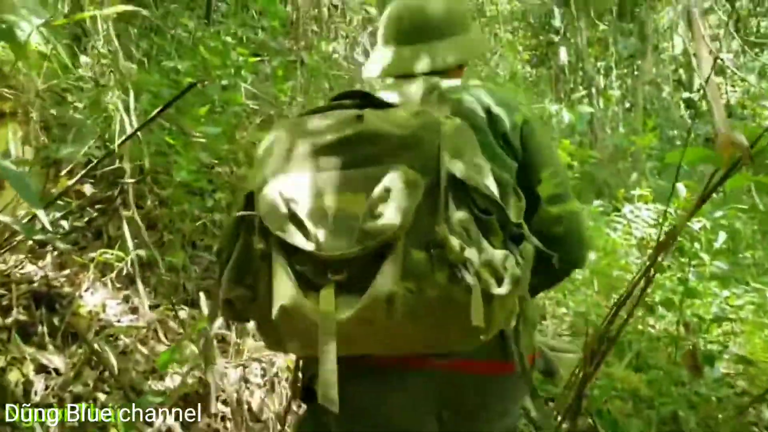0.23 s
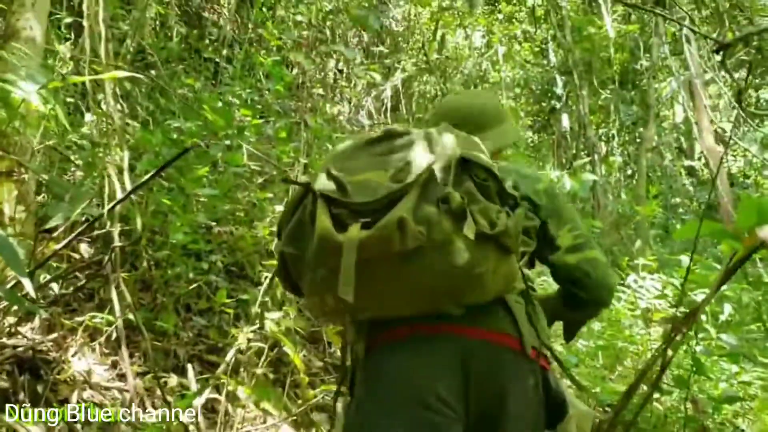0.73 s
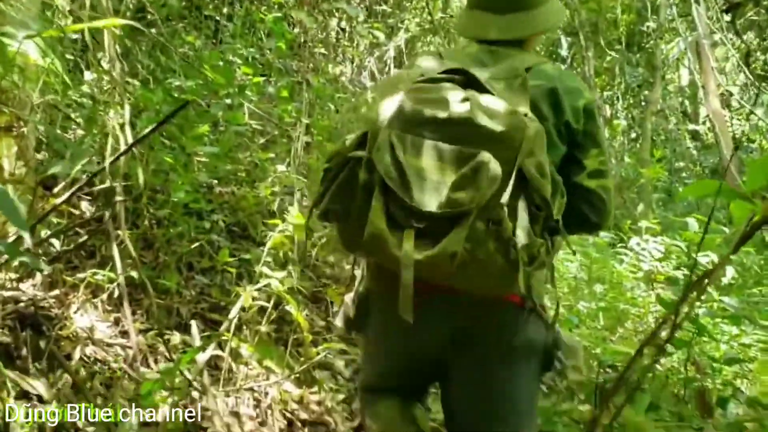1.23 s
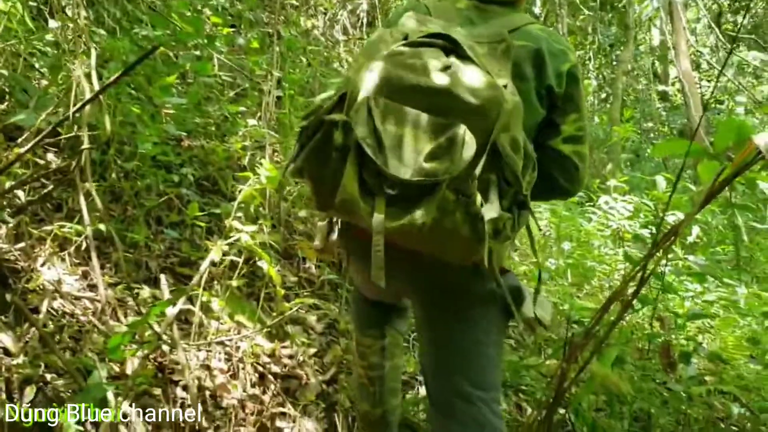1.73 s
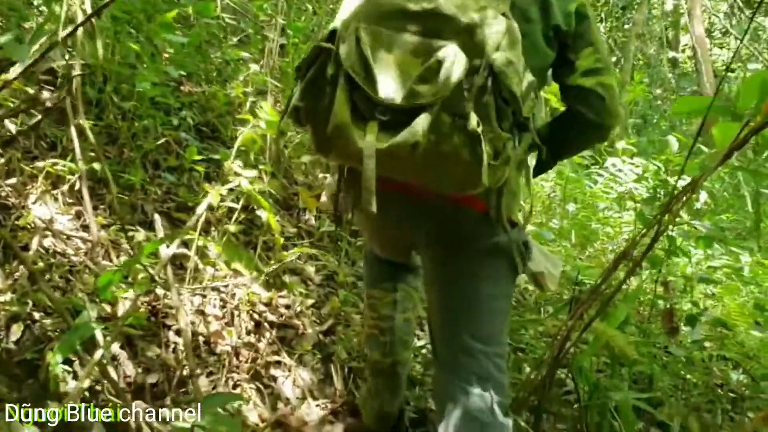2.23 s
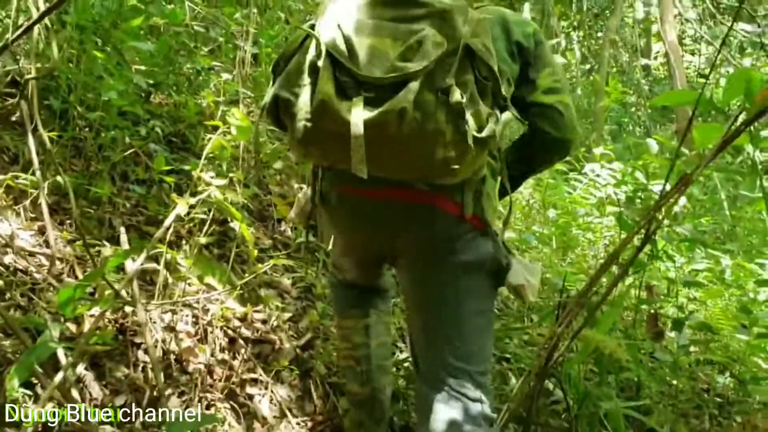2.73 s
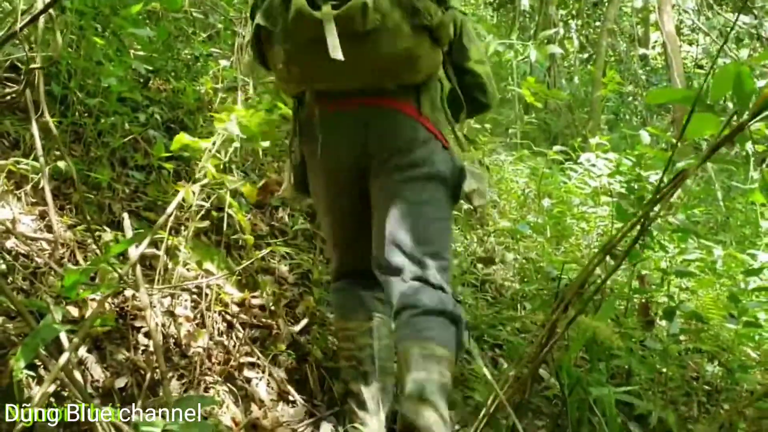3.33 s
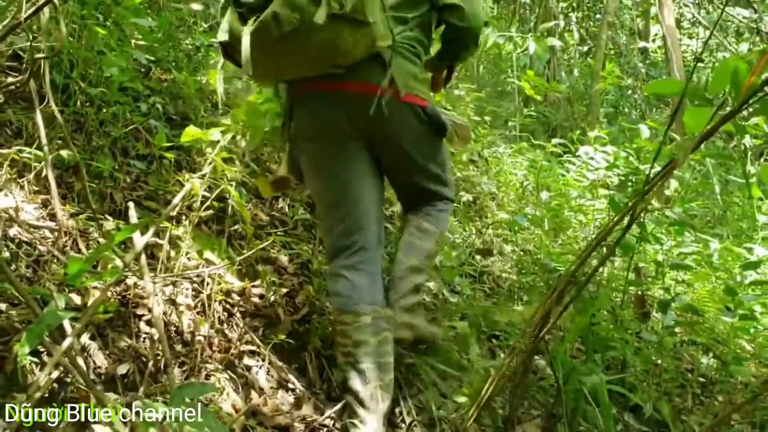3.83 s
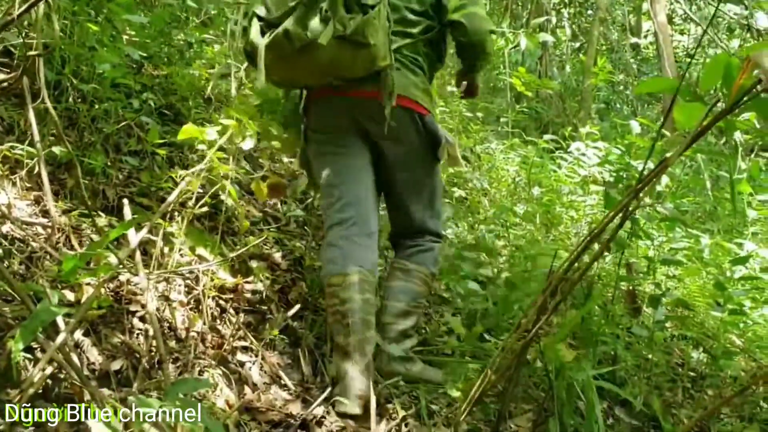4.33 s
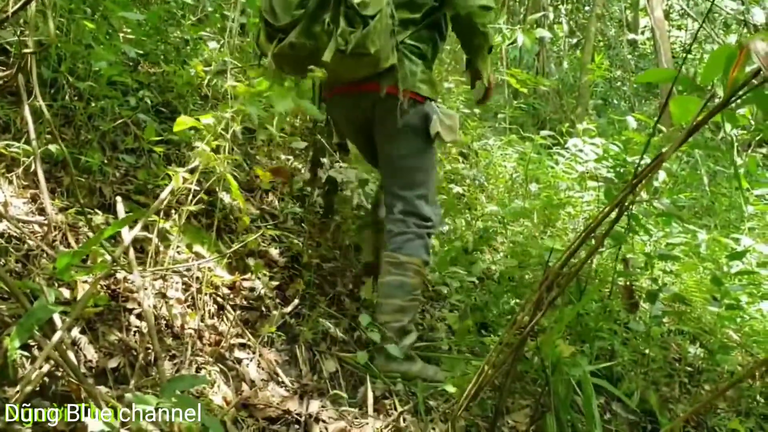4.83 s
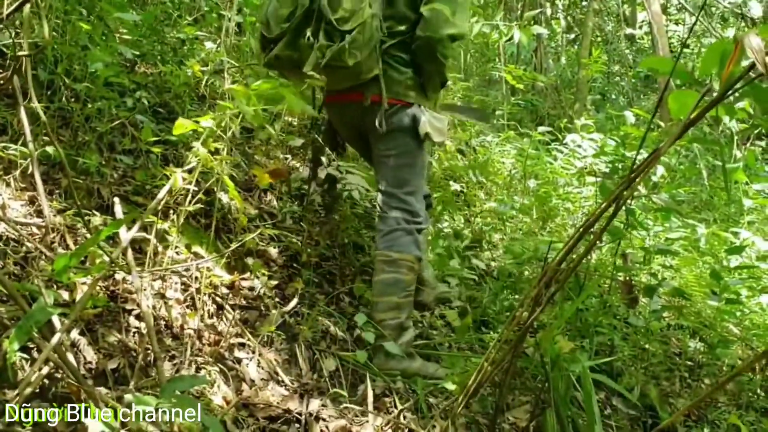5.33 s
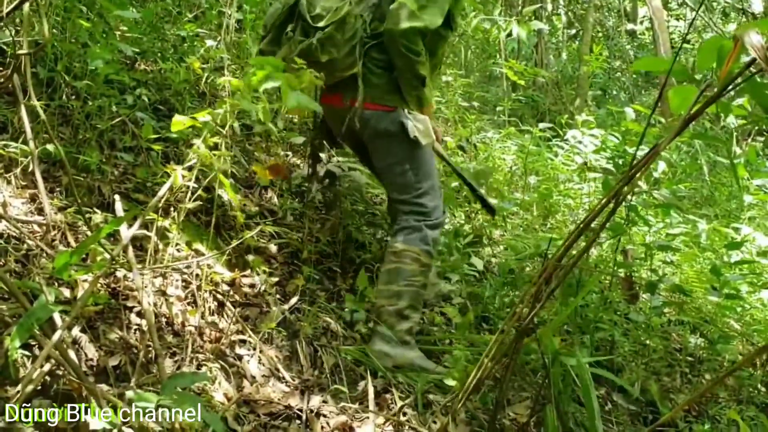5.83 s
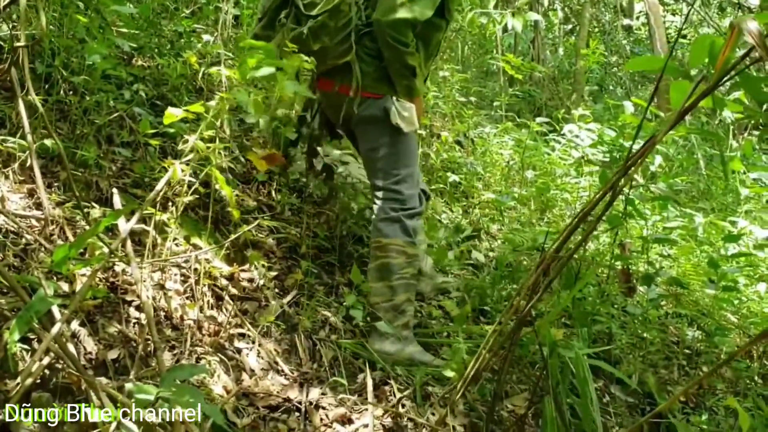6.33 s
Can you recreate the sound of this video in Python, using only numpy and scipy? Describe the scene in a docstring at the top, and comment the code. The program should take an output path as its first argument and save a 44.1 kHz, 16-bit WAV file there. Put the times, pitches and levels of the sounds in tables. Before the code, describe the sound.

Close, dry footsteps of rubber boots in leaf litter: crackling leaves, scraping stems and faint sole creaks. The loudest crush comes within the first second, a firm hollow knock near two and a half seconds, then quieter rustling and another strong crunch around four. Sharp twig snaps scatter throughout. A brief low wind buffet touches the left side. Outdoors in forest, stereo microphone nearby, very faint airy hush.

```python
"""A faint forest hush runs throughout: shaped noise. From the start, rubber boots tread through dry leaf litter:
noise rises and falls with each stroke as leaves crackle, stems scrape, soles crease and soil is pressed.
Random tiny ticks join in; from 0.3 s twig pops and hollow knocks sound as fading rings, from 0.4 s twigs and
brittle leaves snap as noise bursts, and from 0.8 s shorter rings knock too. Around 1.7 to 2.1 s a puff of
wind, made of slow pressure swings and rumble, buffets the left microphone port."""
import sys
import numpy as np
from scipy import signal
from scipy.fft import rfft, irfft, next_fast_len
from scipy.io import wavfile
from scipy.ndimage import uniform_filter1d, map_coordinates

SR = 44100
rng = np.random.default_rng(int(sys.argv[2]) if len(sys.argv) > 2 else 0)


def boost_factor(decibels):
    """Convert a level in decibels to a linear amplitude factor."""
    exponent = np.asarray(decibels, float) / 20
    return 10 ** exponent


def dump(signal):
    """Clip the signal to [-1, 1] and save it as 16-bit WAV at the path in sys.argv[1]."""
    limited = np.clip(np.atleast_2d(signal).T, -1, 1)
    pcm = np.round(limited * 32767).astype(np.int16)
    wavfile.write(sys.argv[1], SR, pcm)


N = 289737  # length in samples
TOP_HZ = 15700  # upper band limit


def unit(x):
    """Scaled to rms 1."""
    return x / np.sqrt(np.mean(x ** 2) + 1e-20)


def along(points, hz):
    """Reads a value off (Hz, value) points joined on a log frequency axis."""
    f, value = np.transpose(points)
    return np.interp(np.log(hz + 1), np.log(f + 1), value)


def wobble(rate):
    """A smooth random curve with rate knots a second."""
    return map_coordinates(rng.standard_normal(N // 50), [np.arange(N) * rate / SR])


def filtered(x, response):
    """Multiplies the spectrum of x by a response of frequency."""
    m = next_fast_len(N + SR // 4)
    hz = np.fft.rfftfreq(m, 1 / SR)
    return irfft(rfft(x, m) * response(hz), m)[..., :N]


# How alike the sound is at the two ports: f/Hz, left-right likeness (1 = the same)
ALIKE = [(60, 0.75), (200, 0.87), (400, 0.74), (800, 0.43), (1500, 0.28), (3000, 0.077), (5000, 0.011)]


def at_ports(pair, spectrum):
    """Foliage scatters sound differently to each port: alike in the bass, unrelated in the treble."""
    def mid_side(hz):
        turn = np.arccos(np.clip(along(ALIKE, hz), -1, 1)) / 2
        return boost_factor(along(spectrum, hz)) * [np.cos(turn), np.sin(turn)]

    mid, side = filtered(pair, mid_side)
    return unit(np.array([mid + side, mid - side]))


def swells(times, levels_db, rises, falls):
    """Power of overlapping strokes, each rising to its peak and falling away steadily in dB."""
    crest_s, shortest_s, step_s = 0.0026, 0.012, 0.001  # peak rounding, least rise or fall, time step
    t = np.arange(0, N / SR + 2 * step_s, step_s)[:, None] - times
    away = np.hypot(t, crest_s) - crest_s
    slope_s = np.maximum(np.where(t < 0, rises, falls), shortest_s)
    power = boost_factor(2 * (levels_db - 20 * away / slope_s)).sum(1)
    return np.interp(np.arange(N) / SR, np.arange(len(power)) * step_s, power)


def breaks(per_s, spread_db, life_ms, clump_db):
    """Loudness of many small fractures: random moments, a few much larger, sudden start, quick fade."""
    chance, size = rng.random(N), rng.exponential(size=N)
    strength_db = spread_db * np.minimum(size, 4) + clump_db * wobble(25)
    kicks = (chance < per_s / SR) * boost_factor(strength_db) ** 2
    keep = np.exp(-1000 / (life_ms * SR))  # share of power left after one sample
    return unit(np.sqrt(signal.lfilter([1], [1, -keep], kicks)))


def crackle(spectrum, fractures, hiss, patchy_db):
    """Fractures heard over a share of smooth rubbing; the favoured pitches change from moment to moment."""
    z = signal.stft(rng.standard_normal((2, N)), nperseg=1024)[2]
    field = rng.standard_normal(z.shape[1:])
    field = uniform_filter1d(field, size=4, axis=0)  # smooth over pitch
    field = uniform_filter1d(field, size=3, axis=1)  # smooth over time
    noise = signal.istft(z * boost_factor(patchy_db * unit(field)), nperseg=1024)[1][:, :N]
    return at_ports(np.sqrt(hiss ** 2 + fractures ** 2) * noise, spectrum)


# Tone of the far hush: f/Hz, relative level/dB per Hz
FOREST = [(24, -50), (40, 15.5), (236, 3), (400, -4), (766, -20), (4410, 13.5), (7280, 6), (8670, -10),
          (15800, -8)]


def forest():
    """Faint hush of far leaves and air: shaped noise whose level wavers slightly."""
    hush = at_ports(rng.standard_normal((2, N)), FOREST)
    return boost_factor(-68.5 + 0.85 * wobble(3.1)) * hush


# Each crush or brush of litter: t/s at peak, leaf level/dB, rise over 20 dB/s, fall over 20 dB/s,
# stems over leaves level/dB; a rise or fall below the shortest allowed, even negative, means abrupt
RUSTLES = [(0.054, -46, -0.3, 0.222, -4.5), (0.113, -46.5, -0.04, 0.03, -8), (0.227, -53.5, 0.4, 0.3, -4.5),
           (0.292, -50.7, 0.059, 0.43, -2.5), (0.4, -42.0, 0.1, 0.02, -6), (0.434, -46, 0.1, 0.083, -5),
           (0.602, -39.5, 0.14, 0.549, -4), (0.707, -36.0, 0, 0.098, -7), (0.784, -35, 0.18, 0.2164, -7.5),
           (0.937, -47, 0.2, 0.12, -7.5), (0.993, -48.3, 0.243, 0.03, -5.1), (1.054, -44, 0.103, 0.06, -2),
           (1.12, -42.5, 0.12, 0.039, -7), (1.304, -50.1, 1.2, 0.178, -7), (1.39, -57.5, -0.2, 0.2, 0.5),
           (1.476, -51, -0.02, 0.18, -3), (1.516, -53, -0.03, 0.08, -1.5), (1.645, -53, 0.014, 0.132, -7.5),
           (1.835, -51.5, 0.118, 1.17, -7), (1.909, -43, 0.05, 0.199, -11.5), (1.976, -48.5, 0, 0.14, -4.5),
           (2.077, -45.5, 0.07, 0.057, -6.4), (2.231, -52.5, -0.26, 0.08, -11.5),
           (2.311, -54, 0.12, 0.27, -6.5), (2.389, -54, -0.17, 0.5, -10.5), (2.482, -39, 0.051, 0.099, -4),
           (2.531, -46.2, 0.04, 0.04, -3.5), (2.793, -48.6, 0.022, 0.122, -11.7),
           (2.916, -49, 0.12, 0.18, -7), (3.01, -51.5, 0.32, 0.17, -6.5), (3.141, -50, 0.14, 0.74, -6),
           (3.29, -50.5, 0.1, -0.5, -11.5), (3.382, -46.5, 0.06, 0.262, -5.5),
           (3.438, -48, 0.2, 0.03, -4.5), (3.598, -51, 0.67, 0.13, -5), (3.651, -49, 0.08, 0.22, -6),
           (3.885, -45, 0.13, 0.54, -10.5), (4.023, -40, 0.172, 0.5665, -8),
           (4.099, -37.5, 0.073, 0.11, -4.5), (4.2, -41.5, 0.29, 0.105, -3.5),
           (4.311, -49.5, 0.1, 0.62, -2), (4.5, -53, 1, 0.11, -2.5), (4.791, -58, 0.2, 0.3, -10),
           (4.995, -60, 0.1, 0.7, -8.5), (5.178, -44.5, 0.07, 0.11, -5.3), (5.287, -54, 0.1, 0.061, -4.5),
           (5.513, -57.5, 0.17, 0.18, -1.2), (5.721, -48, 0.112, 0.22, -7.9),
           (5.818, -46.5, 0.142, 0.112, -6), (5.909, -49.5, 0.14, 0.09, -8.5), (6.162, -52, 0, 0.16, -5),
           (6.198, -48.4, 0.03, 0.18, -3.5), (6.321, -46.1, 0.11, 0.26, -7.5),
           (6.418, -46.4, 0.44, 0.1, -8)]


def rustle_powers():
    """Each stroke through the litter sets the power of leaves and stems together."""
    s, leaf_db, rise, fall, stem_db = np.transpose(RUSTLES)
    return swells(s, leaf_db, rise, fall), swells(s, leaf_db + stem_db, rise, fall)


# Tone of crushed leaves: f/Hz, relative level/dB per Hz
LEAF = [(2500, -21.5), (4500, -2.5), (7000, 1), (8700, -5.5), (11000, -0.5), (14700, 1.5), (17000, -5)]
# Tone of scraped stems: f/Hz, relative level/dB per Hz
STEM = [(500, -54), (900, -10.5), (1250, -4), (1700, -4), (2600, -2.5), (4000, -0.5), (8000, -15.5)]


def litter():
    """Leaves crush crisply; stems scrape lower with the same tiny breaks."""
    crush, scrape = rustle_powers()
    brittle = breaks(per_s=1100, spread_db=3.0, life_ms=2.0, clump_db=1.5)
    leaves = crackle(LEAF, brittle, hiss=1.24, patchy_db=2.0)
    stems = crackle(STEM, brittle, hiss=1.3, patchy_db=2.5)
    return np.sqrt(crush) * leaves + np.sqrt(scrape) * stems


# Weight going onto a boot: t/s at peak, rubber creasing level/dB, weight on soil level/dB,
# rise over 20 dB/s, fall over 20 dB/s; a rise or fall below the shortest allowed means abrupt
FOOTFALLS = [(0.124, -57, -71, 0.3, 0.24), (0.347, -61, -87, 0.2, 0.6), (0.601, -56, -71, 0.26, 0),
             (0.757, -50.5, -66.5, 0.32, 0.29), (0.91, -58.5, -74.5, 0.2, 0.94),
             (1.425, -66, -73.5, 0.4, 0.2), (1.66, -62.5, -75, 0.13, 1.5), (2.084, -61, -65.5, 0.1, 0.8),
             (2.496, -52, -53.5, 0.06, 0.1059), (3.09, -68, -73, 0.5, 2.5), (3.403, -63.5, -61, 0.08, 0.06),
             (4.096, -54.5, -58.5, 0.14, 0.5), (4.191, -65, -50, 0.2, 0.06), (5.22, -70, -75.5, 0.7, 0.37),
             (5.529, -70.5, -72, 0.3, 0.44), (6.212, -65, -67.5, 0.33, 0.53)]
# Tone of the creasing sole: f/Hz, relative level/dB per Hz
SOLE = [(120, -19), (230, -5.5), (400, 1), (550, -3.5), (780, -10.5), (1200, -21.5)]
# Tone of the pressed soil: f/Hz, relative level/dB per Hz
SOIL = [(25, -40), (55, 1), (110, 1.5), (200, 0), (350, -21)]


def boots():
    """Rubber creases and weight thuds into soil, at footfalls and a little as boots move through litter."""
    drag_sole_db, drag_soil_db = -24, -33.5  # under the leaves
    crush, _ = rustle_powers()
    s, sole_db, soil_db, rise, fall = np.transpose(FOOTFALLS)
    crease = swells(s, sole_db, rise, fall) + boost_factor(2 * drag_sole_db) * crush
    thud = swells(s, soil_db, rise, fall) + boost_factor(2 * drag_soil_db) * crush
    creases = breaks(per_s=120, spread_db=3.5, life_ms=2.0, clump_db=-3.0)
    sole = crackle(SOLE, creases, hiss=1.6, patchy_db=1.5)
    soil = crackle(SOIL, creases, hiss=1.44, patchy_db=2.5)
    return np.sqrt(crease) * sole + np.sqrt(thud) * soil


def bursts(rows, lean_db):
    """Each break is a noise burst of a few milliseconds with its own pitch; lean_db is left over right."""
    out, t_ms = np.zeros((2, N + SR)), np.arange(2048) * 1000 / SR
    f = np.fft.rfftfreq(len(t_ms), 1 / SR)
    echo = boost_factor(-18 - 1.3 * t_ms)  # nearby foliage echoes the break
    shape = (1 - np.exp(-t_ms / 0.25)) * (np.exp(-t_ms / 1.1) + echo)
    band = (f < TOP_HZ) * f ** 2 / (f ** 2 + 1800 ** 2)  # little bass
    sides = boost_factor(lean_db / 2 * np.array([[1], [-1]]))
    for s, db, hz in rows:
        colour = 0.65 + np.exp(-(np.log((f + 1) / hz) / 0.34) ** 2)
        noise = rfft(rng.standard_normal((2, len(t_ms))))
        burst = shape * irfft(noise * colour * band) * sides
        burst = burst * 3.5 / np.linalg.norm(burst.mean(0))  # crest about 1
        out[:, round(s * SR):][:, :len(t_ms)] += boost_factor(db) * burst
    return out[:, :N]


def ticks():
    """Small breaks at random moments, their strength following the rustle around them."""
    per_s, least_db, spread_db = 45, 4, 8.5  # rate; least peak over the rustle; extra at most
    draw = rng.random((int(per_s * N / SR), 3))
    s = draw[:, 0] * (N - 1) / SR
    crush, _ = rustle_powers()
    rustle_db = 10 * np.log10(crush[(s * SR).astype(int)])
    level_db = rustle_db + least_db + spread_db * draw[:, 1] ** 2
    hz = 2500 * 6 ** draw[:, 2]
    return bursts(np.transpose([s, level_db, hz]), lean_db=0)


def rings(rows, cycles):
    """One push that fades within a few cycles, alike at both ports, with little deep bass."""
    out, t = np.zeros(N + SR), np.arange(4096) / SR
    for s, db, hz in rows:
        ring = np.sin(2 * np.pi * hz * t) * np.exp(-t * hz / cycles)
        out[round(s * SR):][:len(t)] += boost_factor(db) * ring
    return filtered(out[:N], lambda hz: 1j * hz / (130 + 1j * hz))


# Twig pops and longer-ringing knocks: t/s, level/dB before the ring fades, ring f/Hz
POPS = [(0.2759, -38.5, 1480), (0.684, -40, 600), (0.7985, -34, 566), (0.915, -42, 560), (1.416, -46, 1700),
        (1.5126, -38, 2720), (2.8965, -45, 2220), (4.4855, -41.5, 1300), (5.7179, -42, 1620)]


def pops():
    """A twig pop or hollow knock rings for about two cycles."""
    return rings(POPS, cycles=2.15)


# Single breaks of twigs or brittle leaves: t/s, about the peak level/dB, centre f/Hz
SNAPS = [(0.3922, -29, 15000), (0.4363, -32, 14400), (0.5276, -25.5, 10000), (0.9009, -30, 13000),
         (1.0502, -33, 12000), (1.1234, -36, 13000), (1.4695, -44, 7000), (1.4736, -41, 11000),
         (1.534, -43, 5500), (1.6402, -47, 9000), (1.9041, -32, 14300), (1.9172, -32, 14300),
         (2.079, -34, 13000), (2.151, -32.5, 13500), (2.1545, -38, 5500), (2.2249, -39, 6500),
         (2.7807, -44, 9000), (2.792, -38, 14700), (2.805, -40, 5500), (2.896, -34, 14100),
         (3.1654, -31, 5000), (3.2439, -34.5, 12800), (3.3816, -33, 13100), (3.4917, -37, 5100),
         (3.9791, -28.5, 12000), (4.0135, -31, 9500), (4.1775, -32, 9300), (4.7858, -41, 10000),
         (5.0547, -41, 4400), (5.0945, -44, 5000), (5.1675, -39, 5000), (5.6929, -40, 7000),
         (5.699, -42, 11000), (5.7171, -31, 12000), (5.7184, -33, 7400), (6.0469, -47, 7200)]


def snaps():
    """Twigs and brittle leaves break to the left in bursts, brightest near their own pitch."""
    return bursts(SNAPS, lean_db=4)


# Knocks of the soles on the ground: t/s, level/dB before the ring fades, ring f/Hz
KNOCKS = [(0.7645, -31.5, 610), (2.0789, -41.5, 553), (2.4736, -33, 620), (2.4991, -25, 466),
          (2.504, -33, 180), (4.177, -36, 139), (6.158, -47.5, 318), (6.198, -43.5, 128)]


def knocks():
    """A sole knocks on soft ground, and the ring fades within a cycle or two."""
    return rings(KNOCKS, cycles=0.81)


# Eddies in the wind: t/s at centre, peak level/dB, f/Hz
BUFFET = [(1.691, -43.5, 56), (1.732, -49, 62), (1.779, -46, 56), (1.826, -50, 54), (1.868, -57, 70),
          (2.096, -50.5, 66.3)]


def wind():
    """Eddies roll over the left port, each a slow swing of pressure, joined by a lower-level rumble."""
    t = np.arange(N) / SR
    eddies = np.zeros(N)
    for s, db, hz in BUFFET:
        swing = np.cos(2 * np.pi * hz * (t - s) + rng.uniform(-1.0, 1))
        eddies += boost_factor(db) * np.exp(-((t - s) / 0.013) ** 2) * swing
    rumble = unit(filtered(rng.standard_normal(N), lambda hz: np.exp(-((hz - 65) / 40) ** 2)))
    puff = np.exp(-((t - 1.77) / 0.12) ** 4) * rumble
    return (eddies + boost_factor(-61) * puff) * boost_factor([[0], [-17]])  # left, right


# Difference in sensitivity of the ports: f/Hz, left over right level/dB
LEAN = [(60, 1.5), (180, 3.5), (550, 6), (1650, 0), (4970, 2), (15000, 4)]


def port_balance(x):
    """The ports differ in sensitivity from band to band, the left one stronger or equal."""
    return filtered(x, lambda hz: boost_factor(along(LEAN, hz) / 2 * [[1], [-1]]))


def scene():
    """The walker and forest pass through the port balance; the wind acts on the ports directly."""
    walker = litter() + boots() + ticks() + pops() + snaps() + knocks()
    return port_balance(forest() + walker) + wind()


def band_limit(x):
    """A steep low-pass at the top of the band."""
    return signal.sosfilt(signal.butter(12, 16830, fs=SR, output="sos"), x)


def record(dry):
    """Little passes above the camera's band limit."""
    limited = filtered(dry, lambda hz: np.where(hz < TOP_HZ, 1, boost_factor(-47)))
    return band_limit(limited)


dry = scene()
out = record(dry)
dump(out)
```